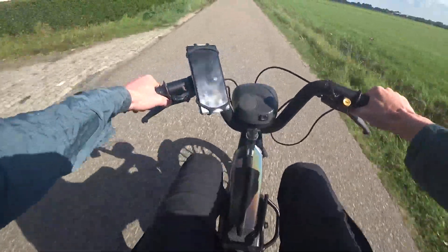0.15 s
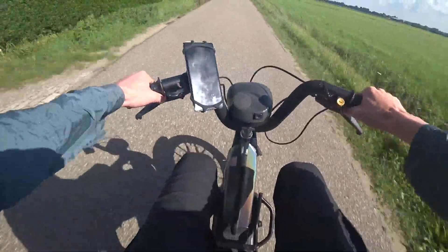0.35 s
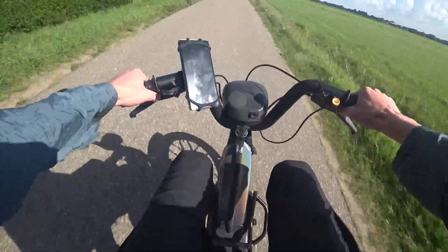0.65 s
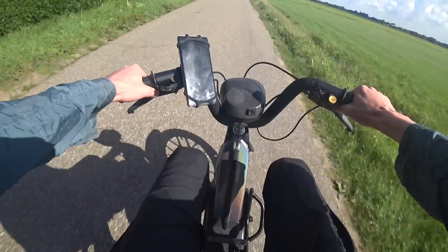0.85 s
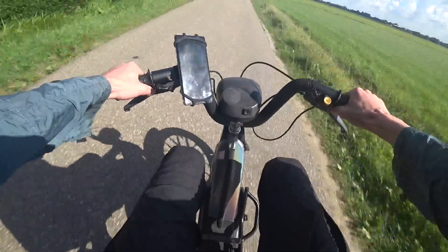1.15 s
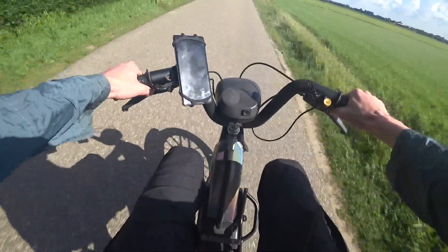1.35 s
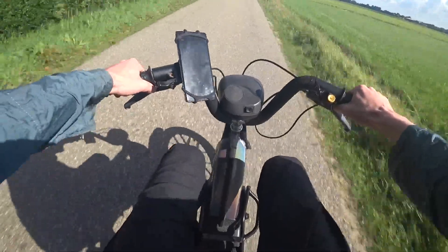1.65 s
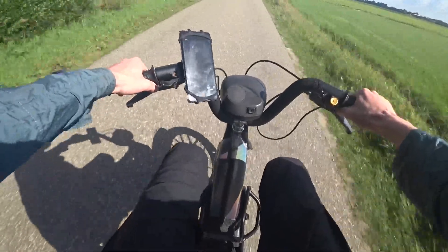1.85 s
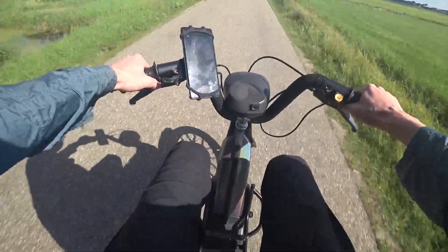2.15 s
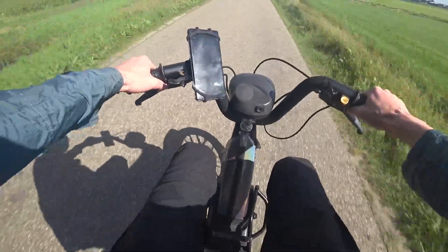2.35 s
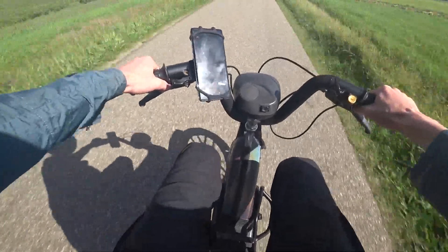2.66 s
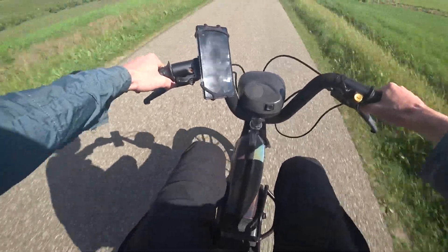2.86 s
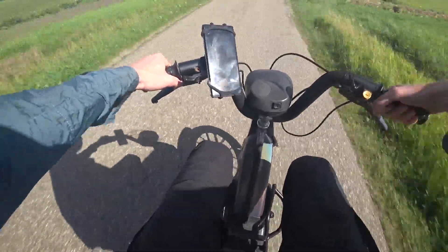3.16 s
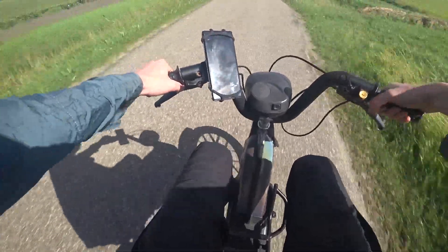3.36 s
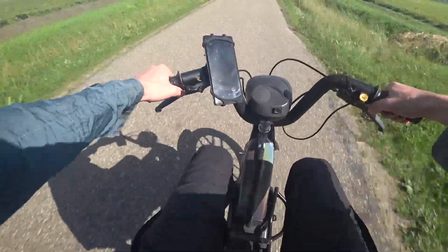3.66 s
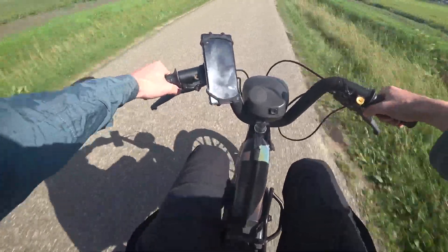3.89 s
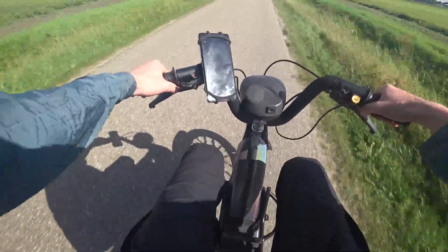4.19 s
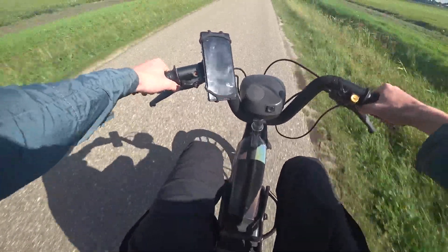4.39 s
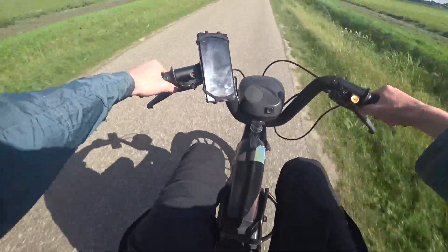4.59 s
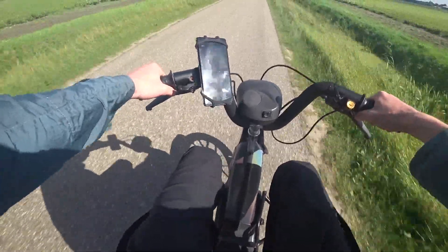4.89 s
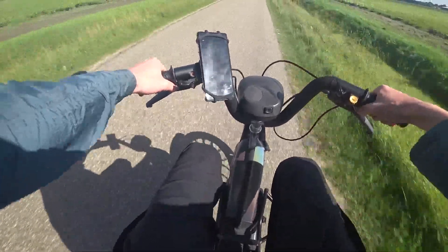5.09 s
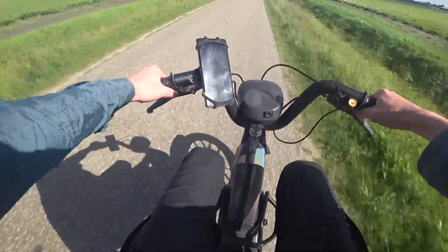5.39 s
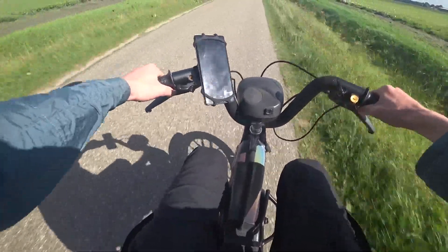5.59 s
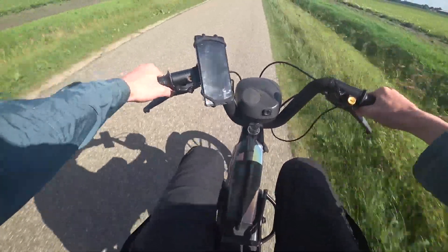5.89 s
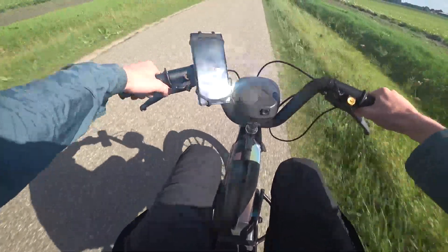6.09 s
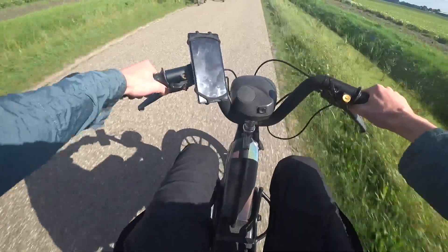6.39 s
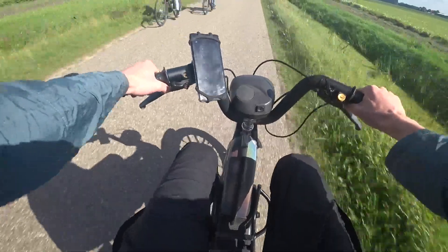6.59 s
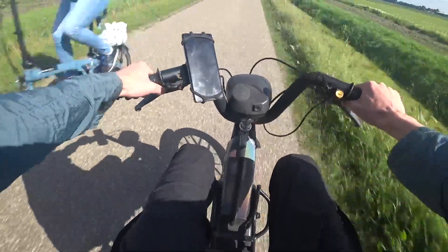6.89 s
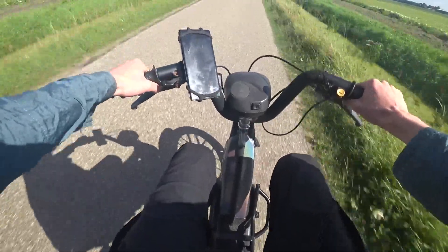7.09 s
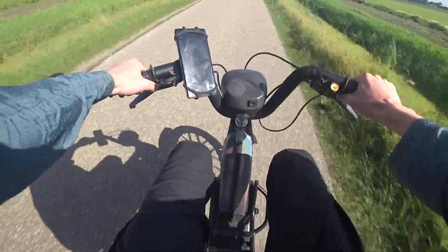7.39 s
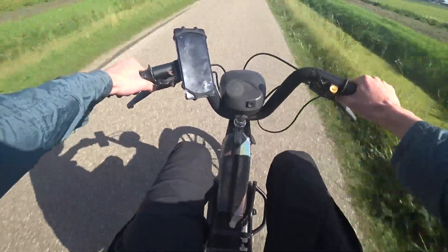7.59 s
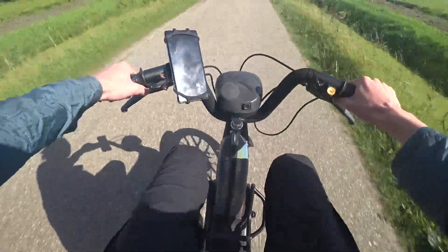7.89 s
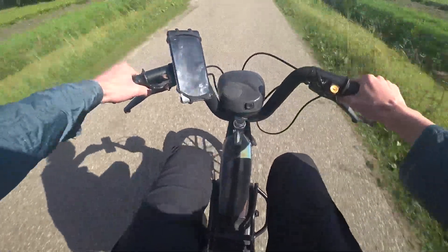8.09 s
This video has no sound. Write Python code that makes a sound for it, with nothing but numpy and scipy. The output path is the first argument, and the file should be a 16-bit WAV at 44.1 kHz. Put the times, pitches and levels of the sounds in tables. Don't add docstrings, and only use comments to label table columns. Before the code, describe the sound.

Outdoors on open asphalt, heard from the rider's chest in close stereo with no obvious echo. From 0 to 3.2 s a tuned two-stroke engine holds a fast, nasal, raspy buzz near 117 to 119 pulses a second, creeping upward, with metallic sizzle and a thin gear whine. Wind gusts thump and flutter irregularly, especially in the first two seconds. At 3.2 s the throttle shuts: the note slides to about 103 by 3.6 s, thins, and uneven pops sputter until 3.8 s. From 3.8 to 6 s a rounder, smoother drone holds near 107, with calmer wind and coarser tyre roll. Two soft wind slaps land near 5.9 s. From 6.1 s the throttle opens, with a small pop, and revs climb to about 115 by 7.2 s, bright and roaring again. A gust hits at 6.9 s, a puff at 7.5 s; the buzz continues steadily to 8.25 s.

```python
import sys
import numpy as np
from scipy import signal
from scipy.fft import rfft, irfft, next_fast_len
from scipy.io import wavfile
from scipy.ndimage import uniform_filter1d, minimum_filter1d, map_coordinates

SR = 44100
rng = np.random.default_rng(int(sys.argv[2]) if len(sys.argv) > 2 else 0)


def materialize(psi):
    bounded = np.clip(np.atleast_2d(psi).T, -1, 1)
    quanta = np.round(bounded * 32767).astype(np.int16)
    wavfile.write(sys.argv[1], SR, quanta)


def gain_from_decibels(decibels):
    exponent = np.asarray(decibels, float) / 20
    return 10 ** exponent


N = 363811

# time_s, level_db
ROAD_COARSENESS = [
    (0, -5),
    (2.5, -0.5),
    (3.6, 2),
    (4.3, 1.5),
    (6.3, 4.5),
    (7, -1.5),
    (8.25, 1),
]
# freq_hz, density_db_per_hz
TYRE_SPECTRUM = [(80, -25), (200, -15), (400, 3.5), (800, -6), (1500, -10), (2500, -15.5)]
# freq_hz, density_db_per_hz
HISS_SPECTRUM = [(1500, -9), (4000, -0.5), (9300, -7.5), (10800, 1), (12000, 1)]

# centre_s, half_length_s, buffet_db, heave_db
GUSTS = [(0, 0.075, -20, -31), (0.21, 0.089, -16, -13), (.38, 0.12, -16.5, -12.5), (0.775, 0.11, -24, -17),
         (1.137, 0.11, -31, -19.5), (1.353, 0.12, -16.5, -13), (1.5, 0.11, -17.5, -16),
         (1.73, 0.095, -21, -14), (1.903, 0.072, -24, -17), (2.274, .08, -29, -17),
         (2.62, 0.11, -26, -16.5), (2.838, 0.097, -27, -23), (3.33, 0.032, -43, -25),
         (4.006, .06, -40, -23), (4.403, 0.084, -34, -23), (4.902, 0.092, -42, -23), (5.3, 0.1, -27, -16),
         (5.664, 0.086, -40, -21.5), (5.85, 0.12, -22, -13.5), (6.105, 0.038, -30, -17),
         (6.233, 0.12, -17, -15), (6.523, 0.13, -21, -20), (6.782, 0.074, -25, -14.5),
         (6.922, 0.096, -12.5, -14), (7.123, 0.094, -22, -21.5), (7.327, 0.071, -39, -31),
         (7.674, 0.13, -28, -19.5), (7.936, 0.13, -17.5, -14.5), (8.124, 0.044, -33, -20),
         (8.25, 0.069, -19, -14.5)]
# centre_s, peak_db, length_s
PUFFS = [
    (4.16, -29, .006),
    (5.876, -11, 0.0035),
    (5.899, -14, 0.0041),
    (6.924, -13, 0.0041),
    (7.519, -15, 0.0052),
]
# freq_hz, density_db_per_hz
BUFFET_SPECTRUM = [(8, -22), (20, -8), (35, -7), (62, 0), (85, 1), (130, -11), (250, -21), (500, -34)]
# freq_hz, density_db_per_hz
FLUTTER_SPECTRUM = [(80, -30), (200, 1), (400, 0), (800, 0), (1500, -13), (1900, -18), (4000, -41)]
# freq_hz, density_db_per_hz
HEAVE_SPECTRUM = [(2, -45), (6, -12.5), (10, 1.5), (20, -10), (40, -21), (80, -69)]
# freq_hz, density_db_per_hz
RUMBLE_SPECTRUM = [(12, -24), (25, -1.5), (35, -2), (60, -5.5), (100, -11.5), (150, -20.5), (300, -27.5),
                   (600, -31), (1200, -68)]
CALM_BUFFET_DB, CALM_HEAVE_DB = -34.5, -26.5
RUMBLE_DB = -28.5
RUMBLE_DB_PER_ROAD_DB, RUMBLE_DUCK_DB_PER_BUFFET_DB = 0.48, 0.027

# time_s, mesh_hz, load_db
GEAR_MESH = [(0, 1089, -28), (.8, 1111, -27), (1.6, 1126, -26), (3.2, 1156, -26), (3.36, 1135, -35),
             (3.7, 1105, -39), (3.9, 1108, -37), (4.7, 1077, -39), (5.3, 1055, -41), (6, 1040, -40),
             (6.9, 1048, -41), (7.2, 1056, -39), (8.25, 1070, -37)]
# freq_hz, level_db
GEAR_COVER = [(2080, -63), (2100, -57), (2115, -52), (2150, -49.5), (2250, -54), (2315, -48)]

# time_s, turns_hz
CRANK_SPEED = [(0, 116.8), (.5, 117.1), (1.6, 118.05), (3, 119.03), (3.18, 119), (3.36, 110.1),
               (3.48, 105.6), (3.59, 103.3), (3.72, 104.5), (4, 106.3), (5, 107.65), (5.4, 107.25),
               (5.8, 107.6), (6.1, 108.7), (6.4, 110.95), (6.75, 114), (7.2, 115.4), (8.25, 115.4)]
# time_s, pulse_strength_db, pulse_sharpness_db
THROTTLE = [(0, -1.5, 2.5), (1, 0, 1.5), (3.18, -1, 6), (3.23, -2.5, -17), (3.33, -6.5, -11),
            (3.42, -14.5, 6), (3.56, -10, -3), (3.62, -1.5, -12), (4.2, -0.5, -11), (6, -0.5, -12),
            (6.12, 0.5, -6), (6.4, 0, -1), (7, -2.5, 2.5), (8.25, -4.5, 6)]
# time_s, size_db re full firing
POPS = [
    (3.31, -14),
    (3.366, -16),
    (3.439, -4),
    (3.603, -15),
    (3.647, -20),
    (3.698, -5),
    (3.769, -6),
    (3.801, 0),
    (6.171, -3),
]
# freq_hz, level_db_per_order
PIPE_SIDE = [(380, -52.5), (585, -32.5), (700, -46), (752, -37), (795, -23), (870, -23.5), (1010, -39.5),
             (1172, -21.5), (1280, -38.5), (1335, -24), (1410, -28), (1560, -27), (1670, -33.5),
             (1780, -50), (2600, -66)]
# freq_hz, level_db_per_order
PIPE_MID = [(400, -56.5), (470, -40.5), (620, -43.5), (750, -54.5), (860, -41.5), (920, -39), (975, -29.5),
            (1036, -36.5), (1062, -33.5), (1165, -26), (1250, -45), (1410, -42.5), (1660, -48), (1790, -66),
            (2600, -71.5)]
# freq_hz, lead_rad
PORT_LEAD = [(450, -.8), (600, .5), (900, 1.3), (960, 3.1), (1040, 4.8), (1100, 7.9), (1500, 8),
             (1700, 4.6), (3200, 4.7), (4500, 4.2), (7000, 4.7), (11000, 4.8)]
# freq_hz, density_db_per_hz
ROAR_SIDE = [(400, -28), (700, -13), (800, -6), (870, -11), (1000, -10), (1110, 0), (1240, -5), (1340, -13),
             (1450, -9), (1700, -14), (1850, -23), (2600, -35)]
# freq_hz, density_db_per_hz
ROAR_MID = [(400, -23.5), (800, -20), (980, -15), (1110, -2), (1240, -15.5), (1340, -21.5), (1700, -24.5),
            (2600, -35.5)]
# freq_hz, density_db_per_hz
FINS_SIDE = [(1200, -19), (1900, 0), (2300, -8.5), (2500, -17), (2860, -11.5), (3140, -2.5), (3450, -1.5),
             (3820, -9), (5220, -2.5), (6690, -14), (8500, -18), (9350, -41), (10800, -39)]
# freq_hz, density_db_per_hz
FINS_MID = [(1200, -22), (1900, -12), (2260, -8), (2470, -13), (2880, -8.5), (3140, -10), (3740, -12.5),
            (5220, -1), (6140, -11.5), (6900, -5.5), (7570, -9), (8600, -14.5), (9000, -19), (10800, -25.5)]
# freq_hz, width_hz, level_db re sizzle
CASING_MODES = [(2257, 30, -6), (2543, 20, 10.5), (2856, 66, 5.5), (2967, 39, 1), (3582, 37, 2.5),
                (3900, 34, 0.5), (4103, 41, 6), (4374, 51, 1), (4910, 37, 5.5), (5195, 28, 2),
                (5760, 40, -13.5), (6220, 30, -23.5), (5800, 270, 7.5), (6480, 38, 8), (6780, 160, 3),
                (7110, 23, 11.5), (7290, 50, 6.5), (7640, 200, 1.5), (8430, 90, 3)]
CRUISE_HZ = 112
ROAR_DB, ROAR_DB_PER_HZ, ROAR_DB_PER_STRENGTH_DB = -41.5, 0.42, 0.32
SIZZLE_DB, SIZZLE_DB_PER_HZ, SIZZLE_DB_PER_STRENGTH_DB = -39.5, 0.2968, 0.13


def unit(x):
    return x / np.sqrt(np.mean(x ** 2) + 1e-20)


def along(points, hz):
    point_hz, value = np.transpose(points)
    return np.interp(np.log(hz + 1), np.log(point_hz + 1), value)


def curves(rows):
    knot_s, *columns = np.transpose(rows)
    time_s = np.arange(N) / SR
    return [np.interp(time_s, knot_s, column) for column in columns]


def wobble(rate_hz):
    knots = rng.standard_normal(int(N * rate_hz / SR) + 4)
    return map_coordinates(knots, [np.arange(N) * rate_hz / SR])


def filtered(x, response):
    size = 2 * next_fast_len(N // 2 + 8192)
    hz = np.fft.rfftfreq(size, 1 / SR)
    return irfft(rfft(x, size) * response(hz), size)[..., :N]


def colour(points, hz):
    octaves_above = np.log2(np.maximum(hz / points[-1][0], 1))
    return gain_from_decibels(along(points, hz) - 30 * octaves_above)


def rush(spectrum):
    return unit(filtered(rng.standard_normal(N), lambda hz: colour(spectrum, hz)))


def causal_phase(points, hz):
    cepstrum = irfft(np.log(colour(points, hz)))
    cepstrum[len(hz):] = 0
    return 2 * rfft(cepstrum).imag


def heard(x, side, mid):
    def response(hz):
        phase_rad = causal_phase(side, hz) + np.array([along(PORT_LEAD, hz), 0 * hz])
        return np.array([colour(mid, hz), colour(side, hz)]) * np.exp(1j * phase_rad)

    return filtered(x, response)


def patchy(x, depth_db):
    z = signal.stft(x, nperseg=512)[2]
    field = rng.standard_normal(z.shape[1:])
    field = uniform_filter1d(field, size=4, axis=0)
    field = uniform_filter1d(field, size=12, axis=1)
    return signal.istft(z * gain_from_decibels(depth_db * unit(field)), nperseg=512)[1][:, :N]


def hiss():
    return gain_from_decibels(-51.0) * np.array([rush(HISS_SPECTRUM), rush(HISS_SPECTRUM)])


def tyres():
    coarse_db, = curves(ROAD_COARSENESS)
    mid = gain_from_decibels(coarse_db) * rush(TYRE_SPECTRUM)
    side = rush(TYRE_SPECTRUM)
    return gain_from_decibels([[-47], [-41]]) * np.array([mid, side])


def gusts(calm_db, peaks_db):
    time_s = np.arange(0, N, 64) / SR
    centre_s, half_length_s = np.transpose(GUSTS)[:2, :, None]
    bells = np.exp(-2 * ((time_s - centre_s) / half_length_s) ** 2)
    power = gain_from_decibels(2 * calm_db) + np.sum(gain_from_decibels(2 * peaks_db)[:, None] * bells, axis=0)
    return np.interp(np.arange(N) / SR, time_s, 10 * np.log10(power))


def puffs():
    time_s = np.arange(N) / SR
    return sum(gain_from_decibels(peak_db) * np.exp(-((time_s - centre_s) / length_s) ** 2)
               for centre_s, peak_db, length_s in PUFFS)


def wind():
    *_, buffet_peaks_db, heave_peaks_db = np.transpose(GUSTS)
    buffet_db = gusts(CALM_BUFFET_DB, buffet_peaks_db)
    heave_db = gusts(CALM_HEAVE_DB, heave_peaks_db)
    flutter_db = 0.64 * buffet_db - 11.5
    rumble_db = RUMBLE_DB + RUMBLE_DB_PER_ROAD_DB * curves(ROAD_COARSENESS)[0]
    rumble_db = rumble_db - RUMBLE_DUCK_DB_PER_BUFFET_DB * (buffet_db - buffet_db.mean())

    buffet = gain_from_decibels(buffet_db) * unit(gain_from_decibels(1.5 * wobble(26)) * rush(BUFFET_SPECTRUM))
    flutter = gain_from_decibels(flutter_db) * unit(gain_from_decibels(1.8 * wobble(30)) * rush(FLUTTER_SPECTRUM))
    rumble = gain_from_decibels(rumble_db) * unit(gain_from_decibels(2.4 * wobble(28)) * rush(RUMBLE_SPECTRUM))
    heave = gain_from_decibels(heave_db) * rush(HEAVE_SPECTRUM)
    return np.array([heave + rumble + puffs(), buffet + flutter])


def gear():
    mesh_hz, tone_db = curves(GEAR_MESH)
    load_db = np.dot([.3, .15], curves(THROTTLE))
    octave_db = along(GEAR_COVER, 2 * mesh_hz) + load_db
    angle = 2 * np.pi * np.cumsum(mesh_hz + 1.2 * wobble(25)) / SR
    tone = np.array([gain_from_decibels(-5) * np.cos(angle), np.sin(angle)])
    octave = np.array([np.cos(2 * angle), -gain_from_decibels(2.0) * np.sin(2 * angle)])
    tone = np.sqrt(2) * gain_from_decibels(tone_db + 1.8 * wobble(20)) * tone
    octave = np.sqrt(2) * gain_from_decibels(octave_db + 2.7 * wobble(20)) * octave
    return tone + octave


def pulses(angle, count):
    half = np.sin(angle / 2)
    half = np.where(np.abs(half) < 1e-7, 1e-7, half)
    return (np.sin((count + .5) * angle) / half - 1) / np.sqrt(2)


def pipe_band(hz):
    return 1 / (1 + (hz / 1270) ** 16) / (1 + (570 / (hz + 1)) ** 16)


def casing_response(hz):
    total = 0
    for k, (mode_hz, width_hz, level_db) in enumerate(CASING_MODES):
        damping = 1j * hz * width_hz
        total = total + (-1) ** k * gain_from_decibels(level_db) * damping / (mode_hz * mode_hz - hz * hz + damping)
    return total


def exhaust(spikes, angle, strength_db, sharp_db):
    tuned = filtered(spikes, pipe_band)
    drive = gain_from_decibels(strength_db) * (tuned + gain_from_decibels(sharp_db) * (spikes - tuned))
    drive += gain_from_decibels(-17 - .6 * strength_db) * np.sqrt(2) * np.cos(8 * angle)
    pop_s, pop_db = np.transpose(POPS)
    pop_index = np.round(pop_s * SR).astype(int)
    pops = np.bincount(pop_index, gain_from_decibels(pop_db), N) * SR / 105 / np.sqrt(2)
    drive += filtered(pops, pipe_band)
    return heard(drive, PIPE_SIDE, PIPE_MID)


def blow_by(turns_hz, strength_db):
    roar_db = ROAR_DB + ROAR_DB_PER_HZ * (turns_hz - CRUISE_HZ) + ROAR_DB_PER_STRENGTH_DB * strength_db
    roar = heard(rng.standard_normal(N), ROAR_SIDE, ROAR_MID)
    return gain_from_decibels(roar_db + 11) * unit(roar)


def sizzle(spikes, angle, turns_hz, strength_db, sharp_db):
    sizzle_db = SIZZLE_DB + SIZZLE_DB_PER_HZ * (turns_hz - CRUISE_HZ)
    sizzle_db = sizzle_db + SIZZLE_DB_PER_STRENGTH_DB * strength_db
    per_order = np.sqrt(SR / 2 / CRUISE_HZ)
    struck = gain_from_decibels(0.23 * sharp_db + 0.5) * filtered(spikes, casing_response) / per_order
    shake = struck + (1 + 0.022 * np.cos(angle - .6)) * rng.standard_normal(N)
    fins = heard(shake, FINS_SIDE, FINS_MID)
    fins = fins / np.sqrt(np.mean(fins ** 2, axis=1, keepdims=True)) * gain_from_decibels([[-.5], [3]])
    fins[0] += gain_from_decibels(-4) * rush(FINS_MID)
    return gain_from_decibels(sizzle_db + .6 * wobble(9)) * patchy(fins, depth_db=1.2)


def engine():
    turns_hz, = curves(CRANK_SPEED)
    strength_db, sharp_db = curves(THROTTLE)
    angle = 2 * np.pi * np.cumsum(turns_hz) / SR + .007 * wobble(25) + .01
    unevenness_db = (.35 - .15 * strength_db) * wobble(60)
    spikes = pulses(angle, count=92) * gain_from_decibels(unevenness_db)
    return (exhaust(spikes, angle, strength_db, sharp_db)
            + blow_by(turns_hz, strength_db)
            + sizzle(spikes, angle, turns_hz, strength_db, sharp_db))


def scene():
    mid, side = tyres() + wind() + gear() + engine()
    return np.array([mid + side, mid - side])


def low_pass(x):
    return signal.sosfilt(signal.butter(12, 10960, fs=SR, output="sos"), x)


def record(dry):
    noisy = dry + hiss()
    needed = np.minimum(1, .94 / (np.abs(noisy).max(axis=0) + 1e-9))
    gain = uniform_filter1d(minimum_filter1d(needed, size=441), size=221)
    return low_pass(noisy * gain)


dry = scene()
out = record(dry)
materialize(out)
```